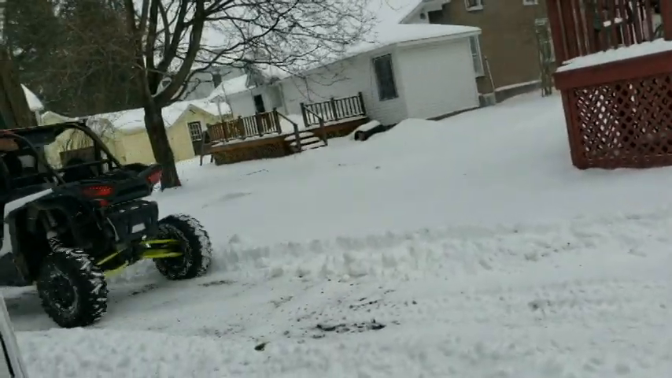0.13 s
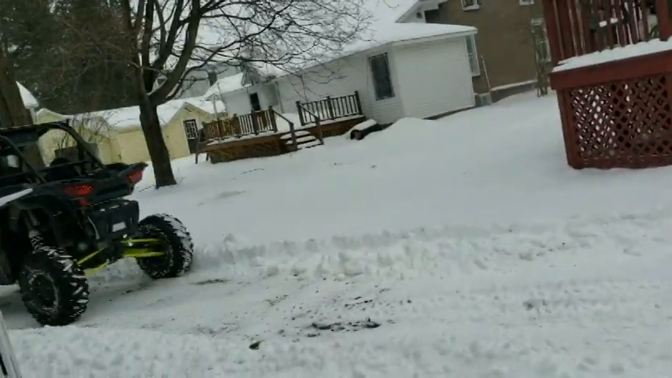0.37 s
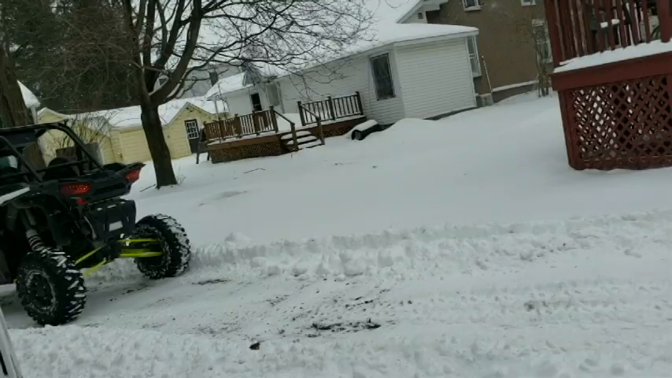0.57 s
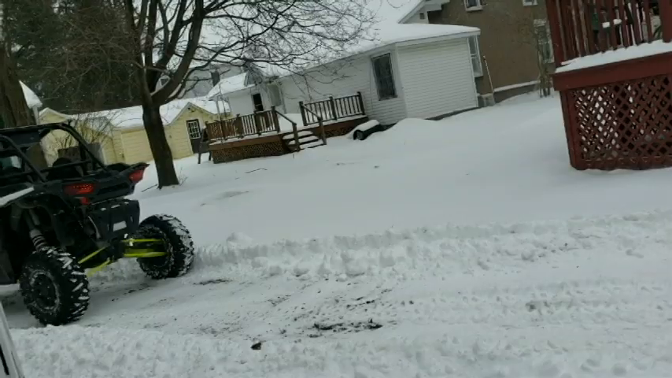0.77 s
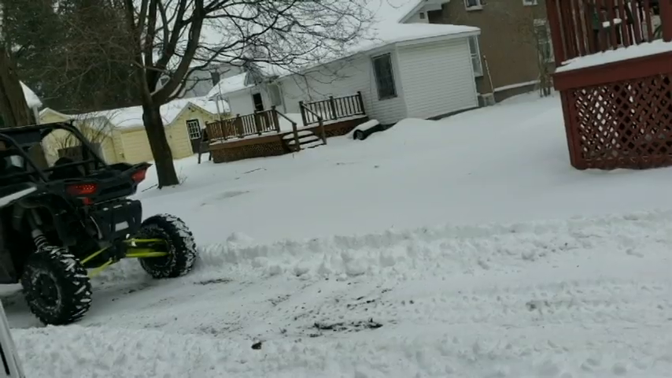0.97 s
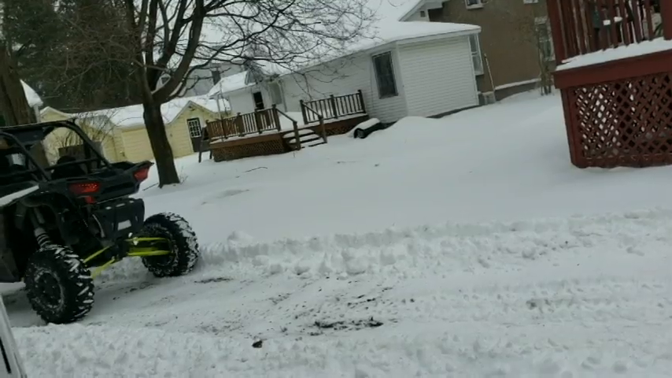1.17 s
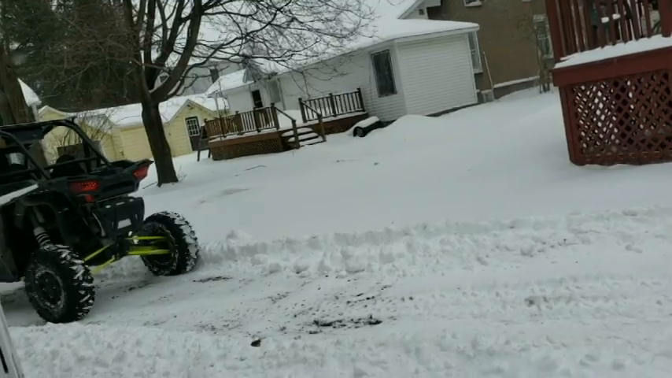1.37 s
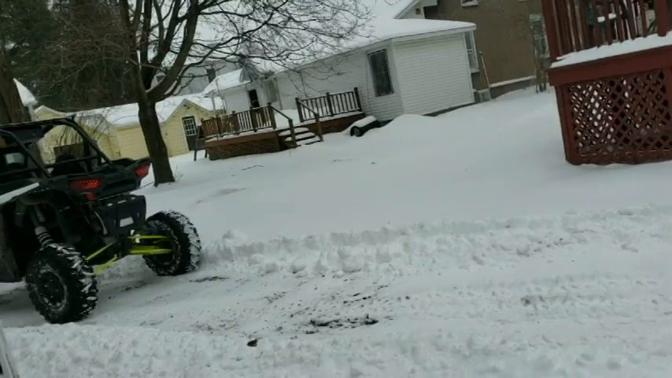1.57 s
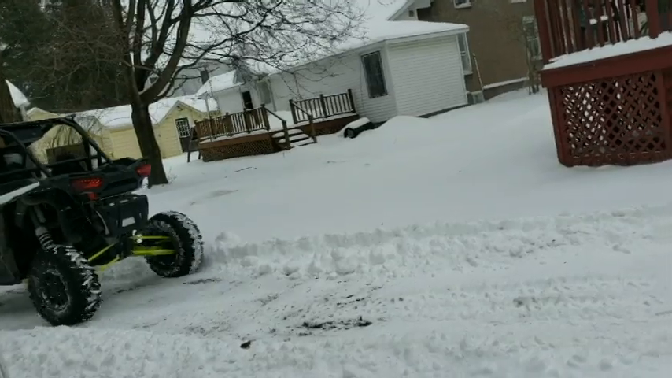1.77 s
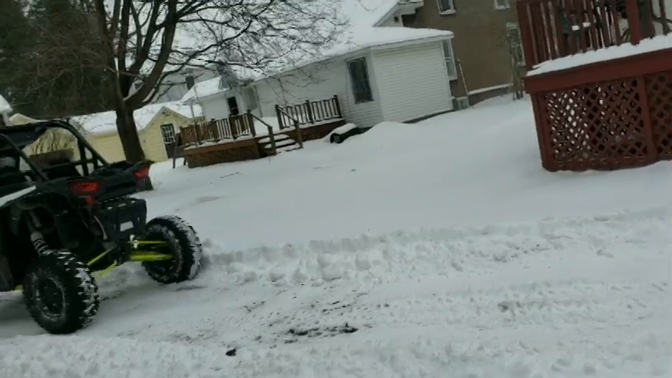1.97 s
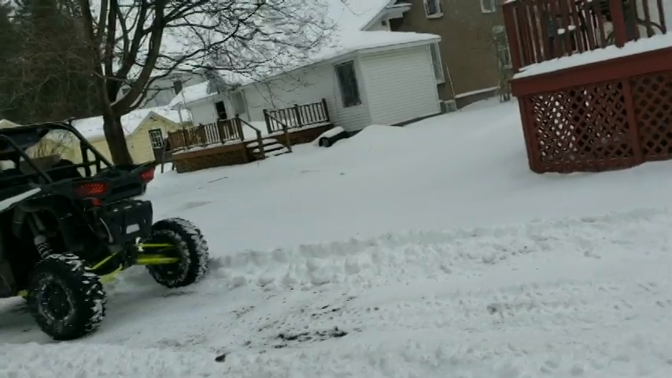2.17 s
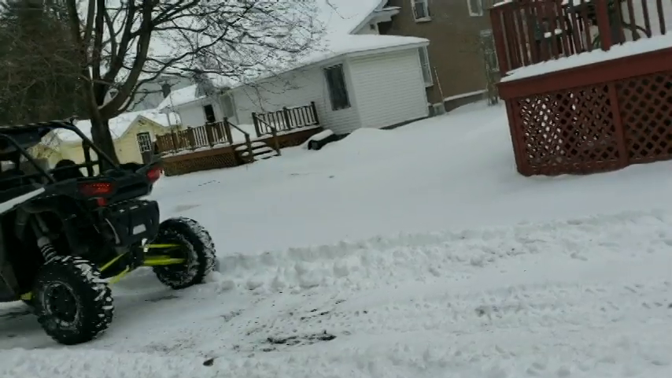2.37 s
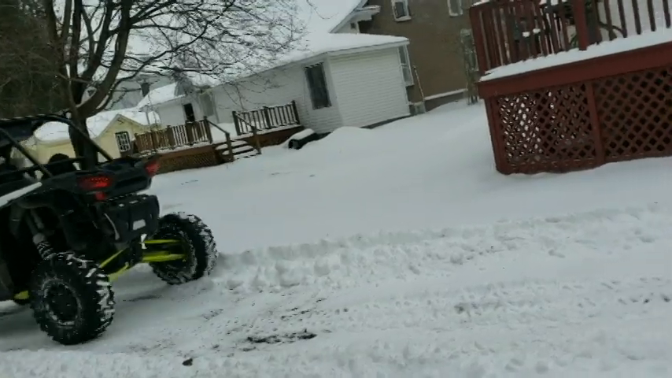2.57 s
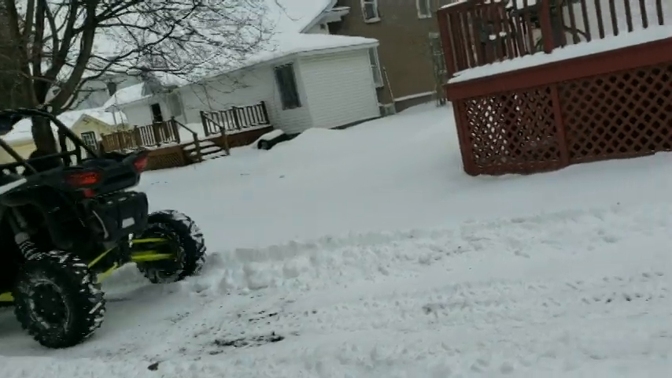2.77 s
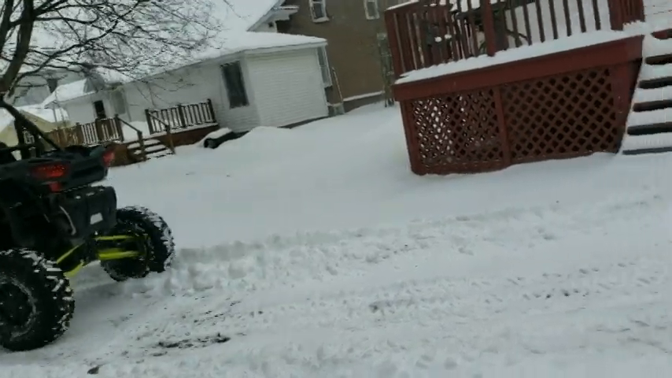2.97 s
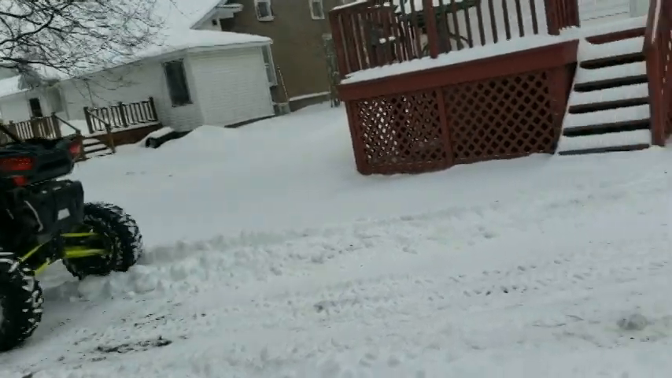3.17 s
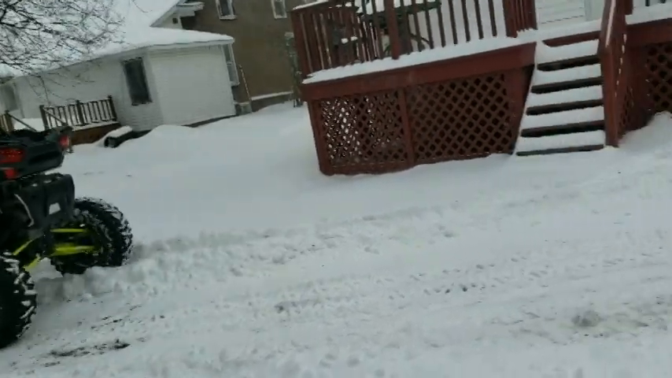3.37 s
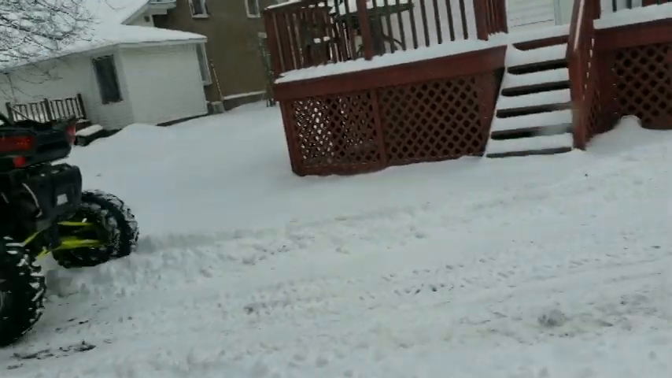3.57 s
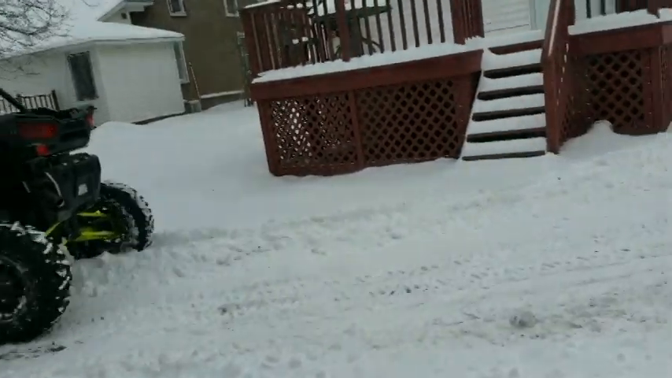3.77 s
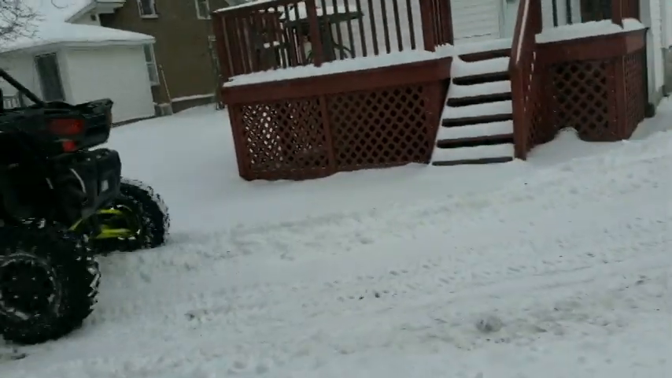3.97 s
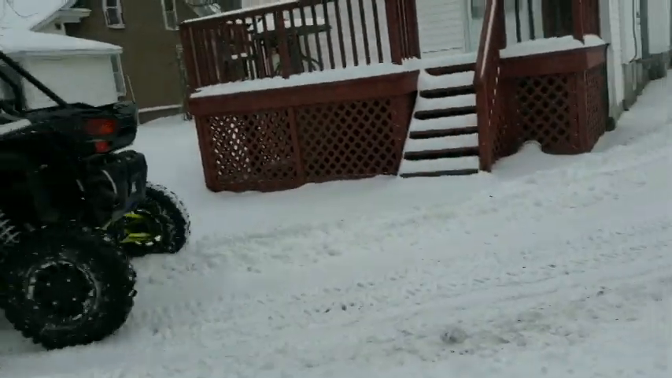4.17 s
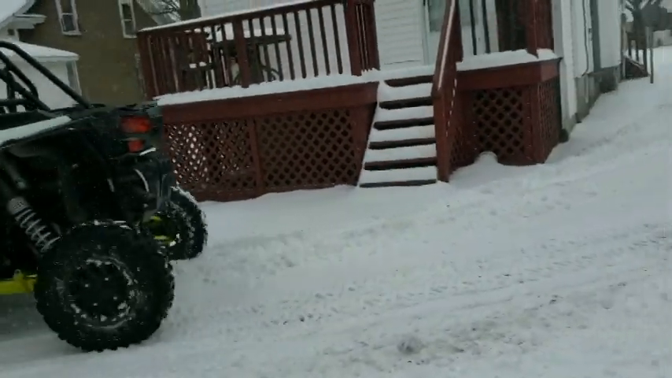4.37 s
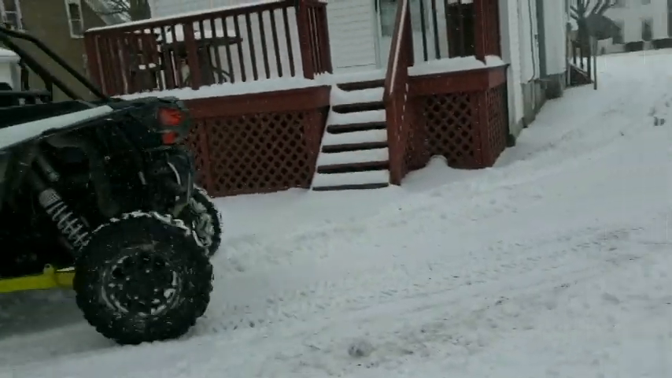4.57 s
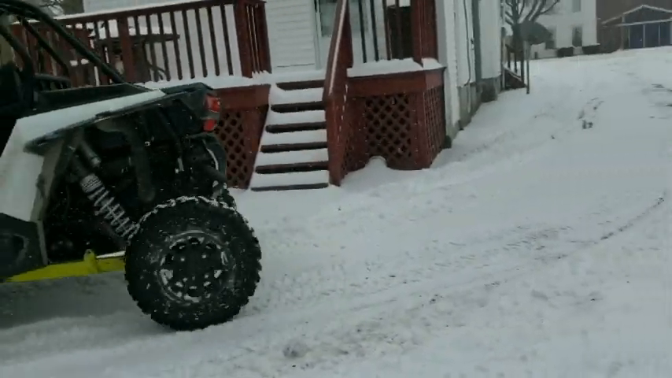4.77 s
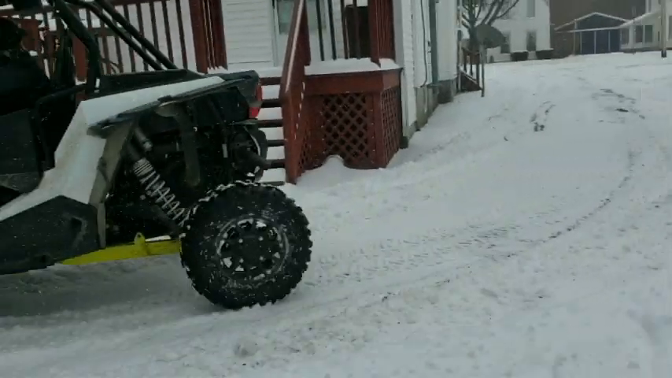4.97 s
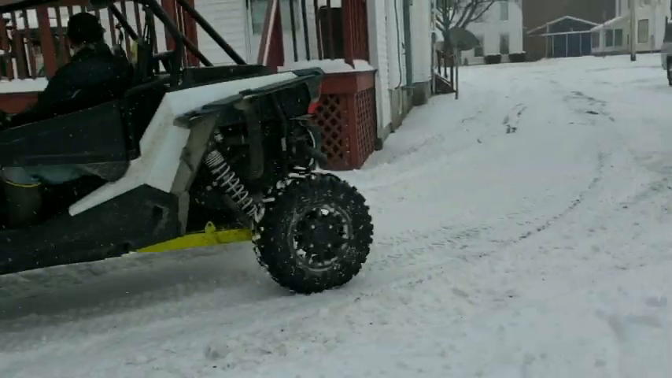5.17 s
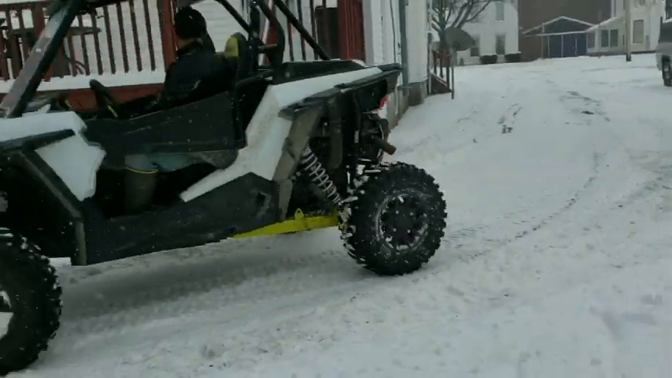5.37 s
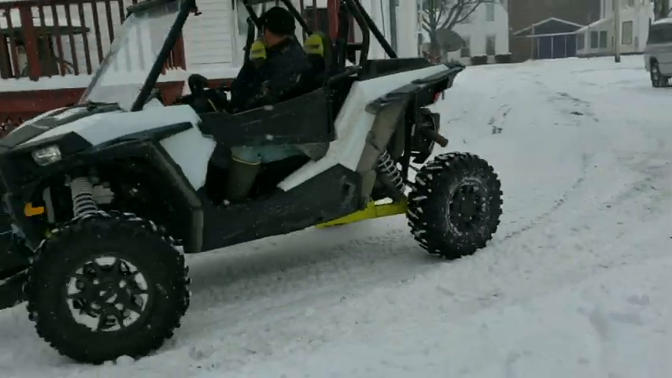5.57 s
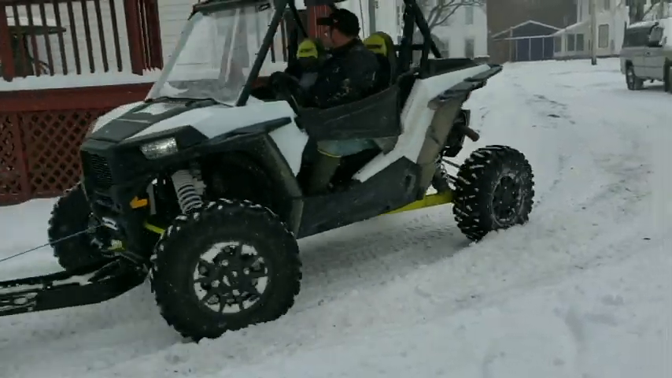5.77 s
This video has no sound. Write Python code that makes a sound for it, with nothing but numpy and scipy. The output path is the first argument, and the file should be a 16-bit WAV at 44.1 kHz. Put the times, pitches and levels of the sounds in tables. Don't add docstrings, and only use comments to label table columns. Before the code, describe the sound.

Outdoors in a snowy yard, a buggy engine idles roughly, picks up with a few clunks, and climbs to a loud, raspy pass.

```python
import sys
import numpy as np
from scipy import signal
from scipy.fft import rfft, irfft, next_fast_len
from scipy.io import wavfile
from scipy.ndimage import uniform_filter1d, map_coordinates

SR = 44100
rng = np.random.default_rng(int(sys.argv[2]) if len(sys.argv) > 2 else 0)


def convert_level_to_amplitude(level_db):
    exponent = np.asarray(level_db, float) / 20
    return 10 ** exponent


def output_pcm(signal):
    pcm = np.clip(np.atleast_2d(signal).T, -1, 1) * 32767
    wavfile.write(sys.argv[1], SR, np.round(pcm).astype(np.int16))


N = 257544
T = np.arange(N) / SR

# start_s, cycles_per_s
ENGINE_SPEED = [(0.0, 11.43), (0.09, 19.54), (0.18, 14.96), (0.28, 15.22), (0.51, 11.42), (0.91, 10.14),
                (1.14, 10.9), (1.26, 16.51), (1.45, 18.32), (2.08, 18.19), (2.33, 21.41), (3.13, 24.55),
                (3.53, 29.97), (3.96, 33.23), (4.39, 34.82), (4.82, 32.97), (5.33, 31.42), (5.84, 31.67)]
# start_s, view (0 idling, 1 far behind, 2 backing, 3 turning, 4 near, 5 side on,
# 6 passing, 7 past), nearness_db
VEHICLE_PATH = [(0, 2.37, -2.5), (.5, 0, 0.5), (1.15, 0, 1.5), (1.3, 1, -0.5), (2.12, 1, 0), (2.5, 2, -2.5),
                (3.1, 2, -3.5), (3.5, 3, -3.5), (3.8, 3, -3), (4.1, 3.5, -3.5), (4.6, 4, -3.5), (5, 5, 0),
                (5.35, 6, -1), (5.84, 7.5, -3.5)]
# view, second_cylinder_db, roughness (0-1), boom_lead_ms
FIRING_BY_VIEW = [
    (0, -2, .18, 3),
    (.6, -3.5, .15, 11),
    (1, -3, .08, 8.5),
    (2, -12, .04, 8),
    (3, -6, .035, 4),
    (4, -3.5, .025, 1),
    (5, -6, .03, -1),
    (7, -6, .045, -1),
]
# view, bark_db, hiss_db
BALANCE_BY_VIEW = [
    (0, 1, -5),
    (.6, -1, -4.5),
    (1, 4, -7.5),
    (2, 6, -4.5),
    (3, 8.5, -6.5),
    (4, 6.5, -5),
    (4.4, 5, -5.5),
    (5, 8.3, -6.5),
    (6, 4.5, -9),
    (7, 4, -9.5),
]


def unit(x):
    return x / np.sqrt(np.mean(x ** 2) + 1e-20)


def even(x, span_s):
    size = int(span_s * SR)
    power = uniform_filter1d(uniform_filter1d(x ** 2, size), size)
    return x / np.sqrt(np.abs(power) + 1e-20)


def along(points, hz):
    f, v = np.transpose(points)
    return np.interp(np.log(hz + 1), np.log(f + 1), v)


def curves(rows):
    s, *cols = np.transpose(rows)
    return [np.interp(T, s, c) for c in cols]


def seen(rows, view):
    at, *cols = np.transpose(rows)
    return [np.interp(view, at, c) for c in cols]


def wobble(rate):
    coarse = T[::12]
    knots = rng.standard_normal(int(N * rate / SR) + 4)
    return np.interp(T, coarse, map_coordinates(knots, [coarse * rate]))


def filtered(x, response):
    m = next_fast_len(N + SR // 2)
    return irfft(rfft(x, m) * response(np.fft.rfftfreq(m, 1 / SR)), m)[..., :N]


def causal(points):
    def response(hz):
        cep = irfft(np.log(convert_level_to_amplitude(along(points, hz)) + 1e-4))
        cep[1:len(hz) - 1] *= 2
        cep[len(hz):] = 0
        return np.exp(rfft(cep))
    return response


def above(hz, edge_hz, order):
    return 1 / np.sqrt(1 + (edge_hz / (hz + 1)) ** (2 * order))


def blend(layers, view):
    return sum(x * np.clip(1 - np.abs(view - k), 0, 1) for k, x in enumerate(layers))


def crank(start):
    return np.cumsum(curves(ENGINE_SPEED)[0]) / SR + start


def running_db():
    idle_db, idle_rate, speed_power = -47, 10.75, 2.042
    rate = uniform_filter1d(curves(ENGINE_SPEED)[0], SR // 5)
    return idle_db + 20 * speed_power * np.log10(rate / idle_rate) + curves(VEHICLE_PATH)[1]


def throttle():
    # start_s, strength_db
    stabs = [
        (.97, 3.5),
        (1.187, 12.5),
        (2.16, 2.5),
        (2.6, 0),
        (3.25, 1),
    ]
    rise_s, fall_s = .03, .11
    since = np.clip(T - np.array(stabs)[:, :1], 0, None)
    shape = (1 - np.exp(-since / rise_s)) * np.exp(-since / fall_s)
    return np.array(stabs)[:, 1] @ (shape / shape.max())


def firings(turn, view):
    gap, jitter, scatter_db = .25, .02, 6
    second_db, rough, _ = seen(FIRING_BY_VIEW, view)
    cycles = np.arange(int(turn[-1]) + 1)
    pulses = np.zeros(N)
    for lag, db in ((0, 0 * T), (gap, second_db)):
        chance = rng.standard_normal((len(cycles), 2))
        at = np.interp(cycles + lag, turn, np.arange(N)).astype(int)
        fired = cycles + lag + jitter * rough[at] * chance[:, 0]
        late = np.interp(fired, turn, np.arange(N)).astype(int)
        pulses[late] += convert_level_to_amplitude(db[at] + scatter_db * rough[at] * chance[:, 1])
    pulses[[0, -1]] = 0
    puff_decay_s = 0.023
    puff = np.convolve(pulses, np.exp(-T[:SR // 20] / puff_decay_s))[:N]
    return pulses, unit(puff), rough


def muffler(drive, view):
    # pitch_hz, level_db
    idle = [(25, -17.5), (50, -11.5), (80, -5), (125, 2), (160, -9.5), (200, -20.5), (260, -39), (350, -29),
            (480, -39), (900, -68)]
    far = [(18, -22), (36, -49), (72, -5), (90, -6), (108, 0.5), (144, -3.5), (163, -8.5), (181, -4),
           (199, -20.5), (235, -25.5), (253, -53), (326, -27.5), (470, -28.5), (978, -54.5)]
    backing = [(23, -37), (46, -34.5), (69, -22), (92, -11.5), (115, 4), (138, 0.5), (231, -36.5),
               (254, -38), (301, -37), (370, -25), (416, -29), (509, -32.5), (810, -50), (972, -30)]
    turning = [(30, -26), (61, -20.5), (91, -24.5), (122, -1), (152, -0.5), (213, -22.5), (244, -40),
               (274, -39), (305, -37), (335, -13.5), (366, -15), (427, -29), (488, -28.5), (946, -34.5)]
    near = [(34, -8), (69, -7), (138, -1.5), (173, -12.5), (207, -34.5), (242, -14), (277, -9),
            (346, -10.5), (381, -4.5), (450, -10.5), (485, -1), (519, -35.5), (762, -31), (935, -34)]
    side = [(31, -9), (63, -21), (94, -2.5), (126, -8.5), (157, -0.5), (189, -4.5), (283, -15.5),
            (378, -11), (410, -1.5), (441, -6.5), (473, -39.5), (567, -26.5), (914, -40), (946, -11)]
    views = (idle, far, backing, turning, near, side)
    closed = lambda p: [(p[0][0] / 2, p[0][1] - 25), *p, (1500, -90)]
    rung = [unit(filtered(drive, causal(closed(p)))) for p in views]
    return blend(rung, np.minimum(view, len(views) - 1))


def tailpipe(bark, view):
    # view, bark_lead_ms, growl_db, scattered_share (0-1)
    outlet = [(0, -1, 2.5, 0.43), (1, 3.5, -0.5, 0.45), (2, 4, 0.5, 0.33), (3, 4, -2, 0.14),
              (3.3, 6.5, -9, 0.57), (4, 6.5, -5.5, 0), (4.4, 5.5, 11, 0.27), (5, 6, -4, 0.27),
              (5.7, 5.5, -17, 0), (6.3, 6.5, 9, 0.1), (7, 5.5, 11, 0)]
    lead_ms, growl_db, scattered = seen(outlet, view)
    bark = even(np.interp(T + lead_ms / 1000, T, bark), span_s=0.11)
    path_ms = (3.08, 6.57, 11.03, 15.3, 21.1)
    paths = [unit(wobble(4.028)) * np.interp(T - ms / 1000, T, bark) for ms in path_ms]
    share = np.clip(scattered, 0, 1)
    bark = np.sqrt(1 - share) * bark + np.sqrt(share) * unit(sum(paths))
    growl = filtered(bark, lambda hz: above(hz, 205, order=8) ** 2 - above(hz, 357, order=6) ** 2)
    return bark + (convert_level_to_amplitude(growl_db) - 1) * growl


def exhaust(pulses, puff, rough, view):
    # start_s, level_db
    chamber_boom = [(0, -20.5), (.3, -15.5), (.5, -20), (1.0, -19), (1.17, -23.5), (1.4, -17.5),
                    (1.75, -15), (2.1, -14), (2.6, -13.5), (2.95, -11), (3.4, -8), (3.7, -12.5),
                    (4.15, -17), (4.6, -23), (5.0, -23), (5.33, -18.5), (5.55, -21), (5.84, -23)]
    # start_s, delay_ms, level_db
    house_wall = [
        (0, 38, -2),
        (.45, 43, -5.5),
        (.6, 39.6, -8.5),
        (1.15, 40, -7),
        (1.4, 35, -8.5),
        (2.2, 36, -9.5),
        (3.2, 29.2, -13),
        (5.84, 23.3, -19.5),
    ]
    boom_db = curves(chamber_boom)[0] + throttle()
    bark_db = running_db() + seen(BALANCE_BY_VIEW, view)[0] + 0.84 * throttle()
    delay_ms, wall_db = curves(house_wall)
    turbulence = 1.5 * rough * puff * rng.standard_normal(N)
    pipe = muffler(unit(pulses) + turbulence, view)
    pipe = pipe + convert_level_to_amplitude(wall_db) * np.interp(T - delay_ms / 1000, T, pipe)
    bark = filtered(pipe, lambda hz: above(hz, 195.0, order=6) ** 2)
    boom = np.interp(T + seen(FIRING_BY_VIEW, view)[2] / 1000, T, pipe - bark)
    bark = filtered(bark, lambda hz: 1 - .6 * above(hz, 680, order=6))
    bark = tailpipe(bark, view)
    return convert_level_to_amplitude(boom_db) * even(boom, span_s=0.18), convert_level_to_amplitude(bark_db) * even(bark, span_s=0.073)


def rattle(turn, size=256, renew=.25):
    patterns = rng.standard_normal((int(turn[-1] * renew) + 4, size))
    return unit(map_coordinates(patterns, [turn * renew, turn % 1 * size], mode="grid-wrap"))


def patchy_noise():
    z = signal.stft(rng.standard_normal((3, N)), nperseg=512)[2]
    field = uniform_filter1d(uniform_filter1d(rng.standard_normal(z.shape[1:]), 6, 0), 8, 1)
    return signal.istft(z * convert_level_to_amplitude(1.2 * unit(field)), nperseg=512)[1][:, :N]


def works(turn, puff, view):
    # pitch_hz, level_db
    far = [(320, -9.5), (550, -2.5), (633, -15), (804, -15.5), (925, -13), (1140, -10), (1310, -11.5),
           (2580, -15), (4160, -20.5), (5990, -24.5), (9940, -18.5), (11900, -7.5), (15800, -22)]
    near = [(320, -2), (550, -8.5), (804, -4), (874, -6.5), (978, -3.5), (1410, -7), (2510, -9.5),
            (3100, -12), (4720, -21), (5910, -21.5), (8760, -24), (11900, -11.5), (15800, -21.5)]
    side = [(320, 1.5), (550, -5.5), (642, -6.5), (718, -8), (804, -8.5), (1230, -3), (1510, -9.5),
            (2440, -11.5), (4340, -20.5), (5830, -30.5), (9800, -29), (11800, -20), (15800, -30.5)]
    # pitch_hz, share (0-1)
    repeating = [(500, .85), (1200, .75), (2000, .3), (4000, .1)]
    clatter_db = running_db()
    hiss_db = clatter_db + seen(BALANCE_BY_VIEW, view)[1]
    noise = patchy_noise()
    tied = lambda hz: along(repeating, hz)
    loose = filtered(unit(noise[0]), lambda hz: np.sqrt(1 - tied(hz)))
    noise[0] = loose + filtered(rattle(turn), lambda hz: np.sqrt(tied(hz)) / 2.4)
    grit_db = 0.34 * wobble(40) + 0.82 * wobble(300) + 0.51 * wobble(8)
    noise = np.array([unit(row) for row in noise]) * (1 + 0.11 * puff) * convert_level_to_amplitude(grit_db)
    colours = [unit(filtered(noise, lambda hz: convert_level_to_amplitude(along(c, hz)))) for c in (far, near, side)]
    mix = blend(colours, np.clip((view - 2) / 2, 0, 1) + np.clip(view - 4, 0, 1))
    hiss = filtered(mix, lambda hz: above(hz, 4340, order=4) ** 2)
    clatter = (mix - hiss) * (1 + .5 * puff)
    band = filtered(clatter, lambda hz: above(hz, 424, order=4))
    scale = lambda part: np.sqrt(np.abs(uniform_filter1d(part[0] ** 2, SR // 3)) + 1e-20)
    return convert_level_to_amplitude(clatter_db) * clatter / scale(band) + convert_level_to_amplitude(hiss_db) * hiss / scale(hiss)


def whines(turn):
    # start_s, end_s, first_hz, last_hz, level_db
    whine = [(4.77, 5.2, 1240, 1232, -33), (5.2, 5.65, 1205, 1200, -36.5), (5, 5.5, 975, 975, -38),
             (4.85, 5.15, 1400, 1390, -41), (5.22, 5.6, 1620, 1760, -44), (3.47, 3.82, 1560, 1585, -36),
             (1.35, 1.85, 1545, 1550, -51), (3.7, 4.2, 990, 1050, -40), (5.05, 5.9, 640, 620, -39),
             (3.05, 3.3, 8260, 8200, -59.5), (2.95, 3.25, 6750, 6250, -59.5), (4, 4.85, 3010, 3000, -49)]
    # start_s, end_s, first_hz, last_hz, level_db
    rasp = [
        (5.2, 5.5, 2550, 2500, -40),
        (5.22, 5.85, 2150, 2050, -39.5),
    ]
    whine_waver_hz, rasp_waver_hz, fade_s = 6, 175, .06
    tones = [(*row, whine_waver_hz) for row in whine] + [(*row, rasp_waver_hz) for row in rasp]
    out = np.zeros(N)
    for start, end, first_hz, last_hz, db, waver_hz in tones:
        on = (T > start) & (T < end)
        glide_hz = np.interp(T[on], [start, end], [first_hz, last_hz])
        hz = glide_hz + waver_hz * wobble(30 + 2 * waver_hz)[on]
        gate = np.clip(np.minimum(T[on] - start, end - T[on]) / fade_s, 0, 1)
        level = convert_level_to_amplitude(db + 2.5 + 1.8 * wobble(20)[on])
        out[on] += gate * level * np.sin(2 * np.pi * np.cumsum(hz) / SR)
    return out * (1 + 0.65 * np.cos(2 * np.pi * (turn - .15)))


def clunks():
    # start_s, peak_db, bright_part_db, length_s
    knocks = [(0.696, -39, 3, 0.013), (0.718, -39, 5, 0.0075), (0.837, -44.5, -2, 0.022),
              (1.185, -45, -11, 0.015), (1.201, -41.5, 0, 0.021), (1.227, -40, -1, 0.008),
              (1.259, -37.5, 2, 0.011), (1.274, -39.5, 4, 0.017), (1.322, -37, 3, 0.013),
              (1.344, -30, -8, 0.022), (1.645, -31.5, -5, 0.01), (1.965, -37, 3.5, 0.014),
              (2.2, -41, -1, 0.012)]
    dull, bright, t = np.zeros(N), np.zeros(N), T[:SR // 10]
    for s, db, bright_db, length in knocks:
        shape = t / 0.0031 / (1 + t / 0.0072) * np.exp(-(t / max(length, .002)) ** 2)
        dull[round(s * SR):][:len(t)] += convert_level_to_amplitude(db) * shape
        bright[round(s * SR):][:len(t)] += convert_level_to_amplitude(db + bright_db) * shape
    grit = rng.standard_normal((2, 3, N))
    # (Hz, dB)
    dull_colour = [(500, -22), (1200, 13), (3000, 7), (5000, 2.0), (8000, -8), (12000, -40)]
    bright_colour = [(5000, -26), (8000, -9), (12000, 7), (15000, -6)]
    part = lambda env, g, colour: filtered(env * g, lambda hz: convert_level_to_amplitude(along(colour, hz)))
    return convert_level_to_amplitude(-3) * part(dull, grit[0], dull_colour) + convert_level_to_amplitude(2) * part(bright, grit[1], bright_colour)


def yard(x):
    # pitch_hz, t60_s
    decay = [(100, 0.22), (500, 0.45), (3000, 0.2), (12000, 0.052)]
    hz, t, z = signal.stft(rng.standard_normal((2, SR // 2)), SR, nperseg=256)
    tail = signal.istft(z * convert_level_to_amplitude(-60 * t / along(decay, hz)[:, None]), SR, nperseg=256)[1]
    late = np.pad(x, (700, 0))[None]
    return signal.fftconvolve(late, tail / np.linalg.norm(tail[0]), axes=1)[:, :N]


def scene():
    # start_s, balance_db (left minus right is this less 2 dB), left_lead_ms
    place = [
        (0, 1.5, 0.23),
        (2, 1, 0.25),
        (3.7, 2, 0.27),
        (4.3, 3, 0.28),
        (4.8, 1.5, 0.25),
        (5.2, 0.5, 0.17),
        (5.7, 1, 0.026),
    ]
    # pitch_hz, share (0-1)
    alike = [(60, 0.58), (300, 0.84), (700, 0.79), (1500, 0.58), (3000, 0.6), (6000, 0.093), (12000, 0.036)]
    view = np.clip(curves(VEHICLE_PATH)[0], 0, 7)
    turn = crank(start=-0.0305)
    pulses, puff, rough = firings(turn, view)
    boom, bark = exhaust(pulses, puff, rough, view)
    upper = bark + whines(turn)
    noise = works(turn, puff, view) + clunks()
    share = lambda hz: np.clip(along(alike, hz), 0, 1)
    direct = boom + upper + filtered(noise[0], lambda hz: np.sqrt(share(hz)))
    diffuse = filtered(noise[1:], lambda hz: np.sqrt(1 - share(hz)))
    diffuse = diffuse + yard(convert_level_to_amplitude(-22) * boom + convert_level_to_amplitude(-14) * upper)
    left_db, left_lead_ms = curves(place)
    half = left_lead_ms * SR / 2000
    shifted = [map_coordinates(direct, [np.arange(N) + side * half], mode="nearest") for side in (1, -1)]
    return (np.array(shifted) + diffuse) * convert_level_to_amplitude(np.array([left_db - 2, 2 - left_db]) / 2)


def band_limit(x):
    return signal.sosfilt(signal.butter(12, 16580, fs=SR, output="sos"), x)


def record(dry):
    # pitch_hz, left_minus_right_db
    tilt = [(60, 4), (110, 3.5), (200, 2), (380, 1.5), (700, 1.5), (1290, 0), (2380, 1), (4400, 4),
            (8120, 4.5), (15000, 4.5)]
    x = filtered(dry, lambda hz: convert_level_to_amplitude(np.array([along(tilt, hz), -along(tilt, hz)]) / 2))
    x = x / (1 + np.abs(x / 1.02) ** 5) ** (1 / 5)
    x = filtered(x, lambda hz: hz < 15900)
    return band_limit(x)


dry = scene()
out = record(dry)
output_pcm(out)
```